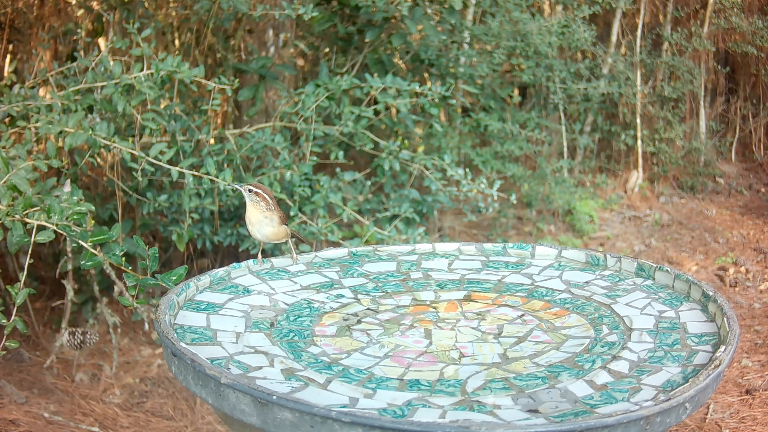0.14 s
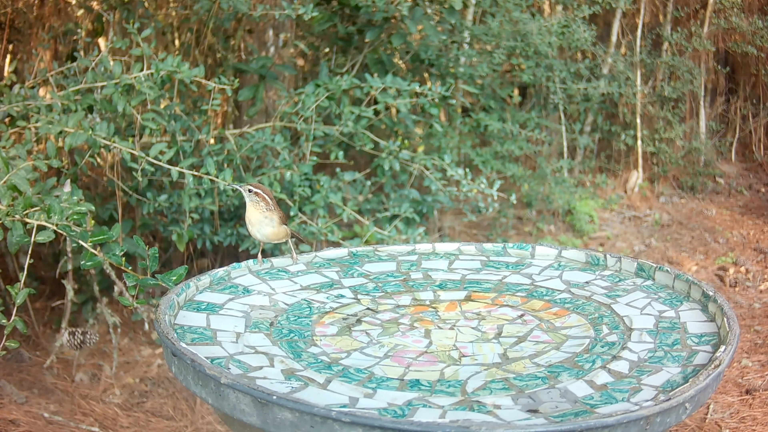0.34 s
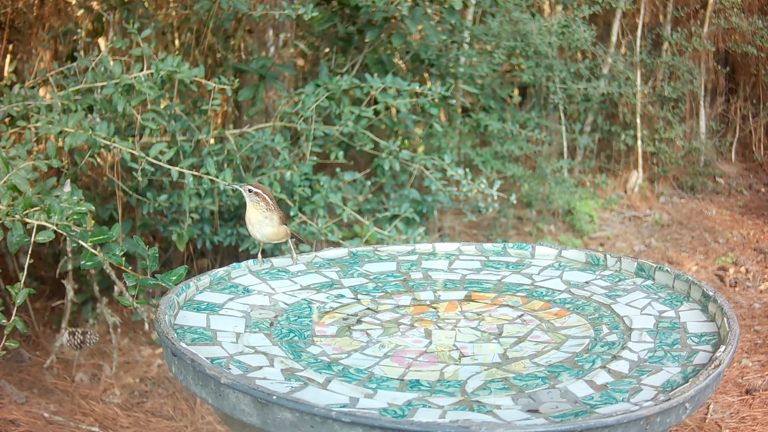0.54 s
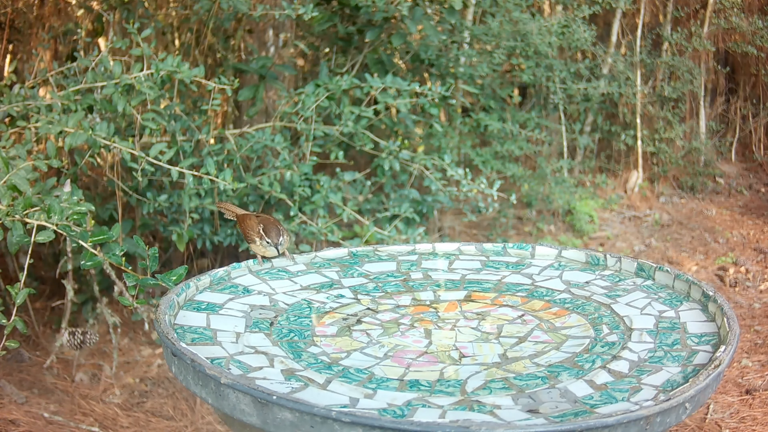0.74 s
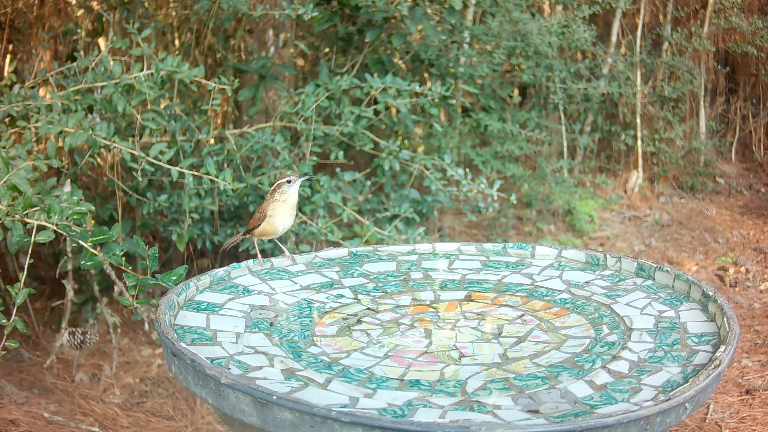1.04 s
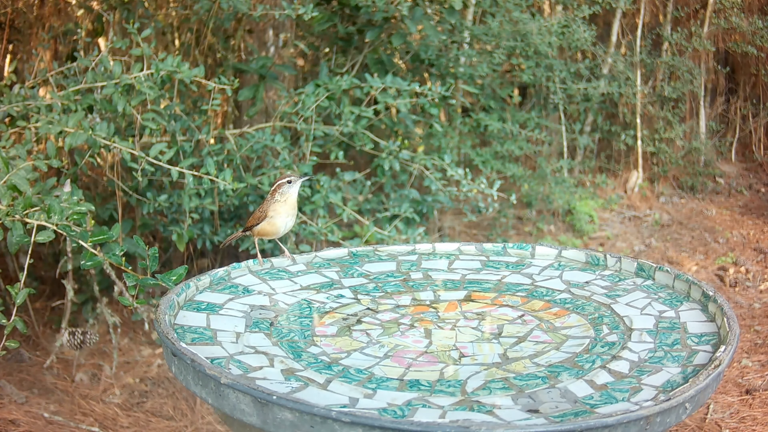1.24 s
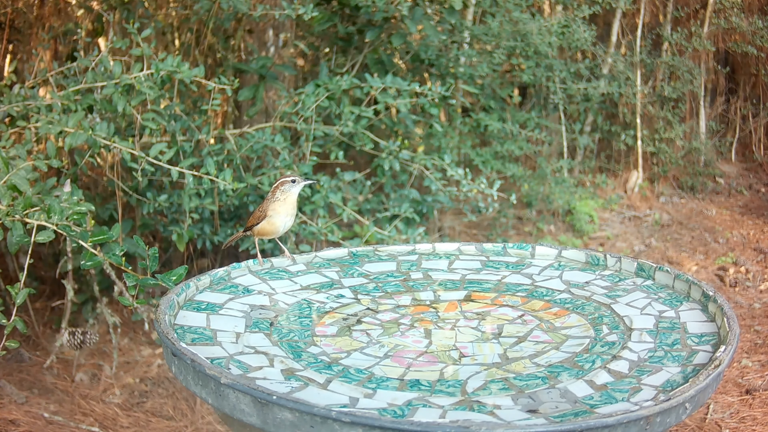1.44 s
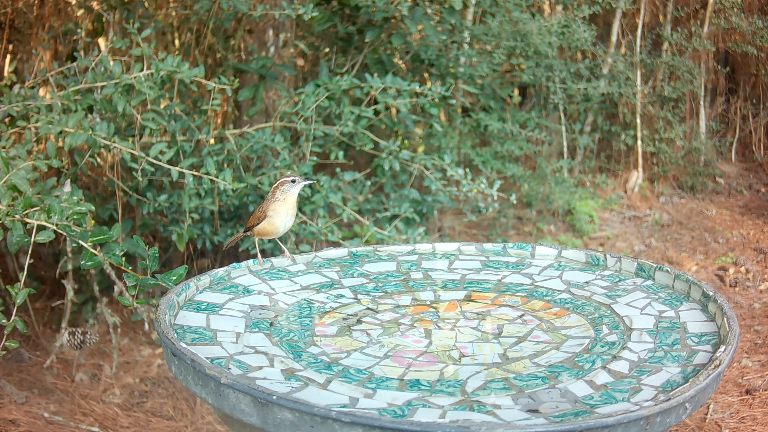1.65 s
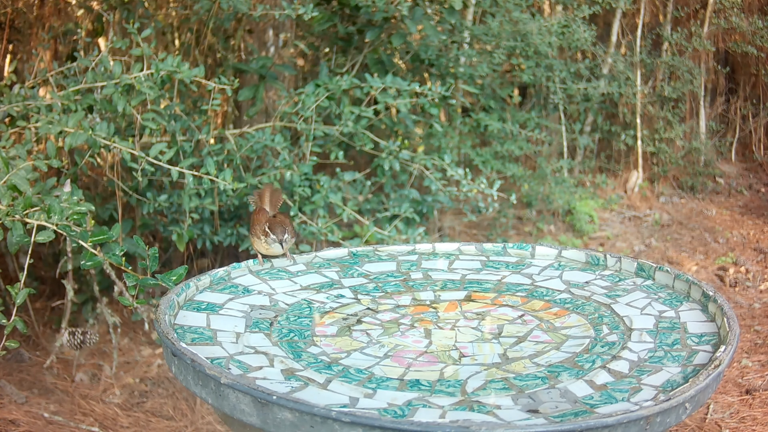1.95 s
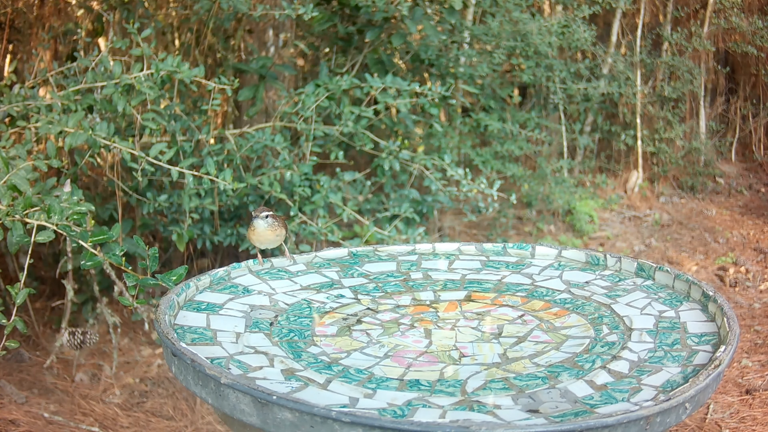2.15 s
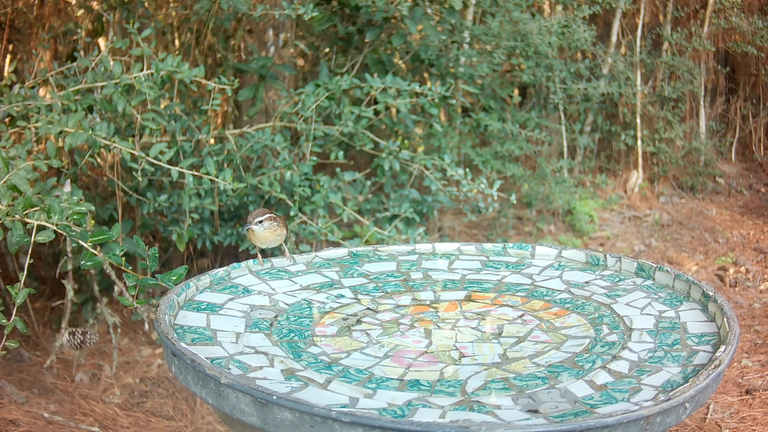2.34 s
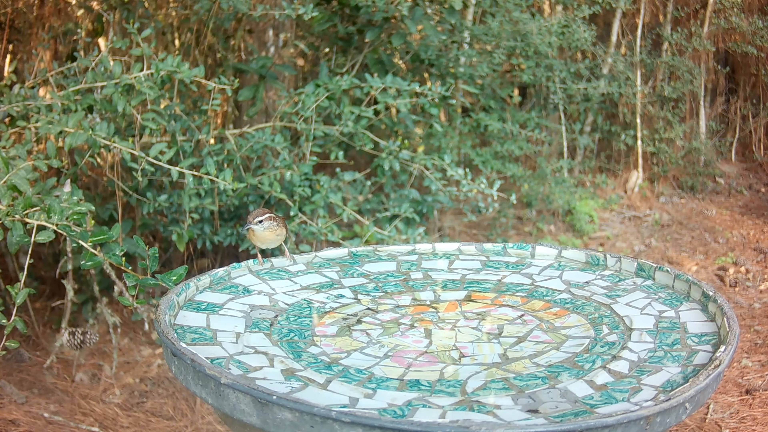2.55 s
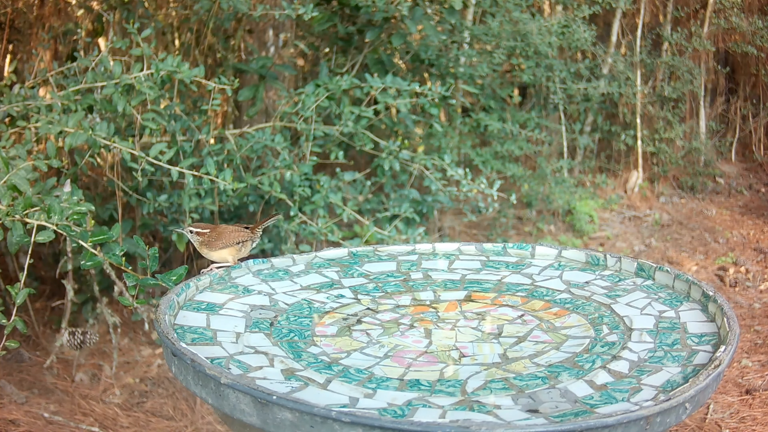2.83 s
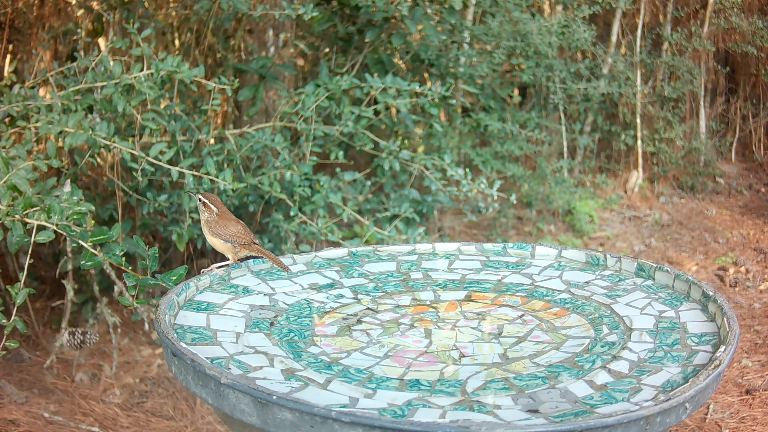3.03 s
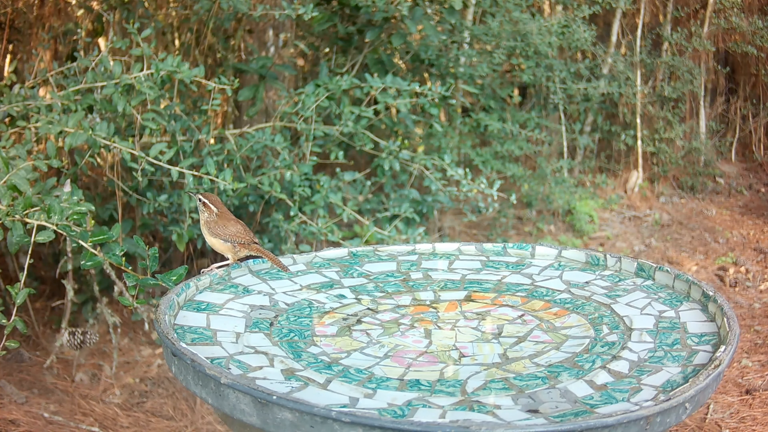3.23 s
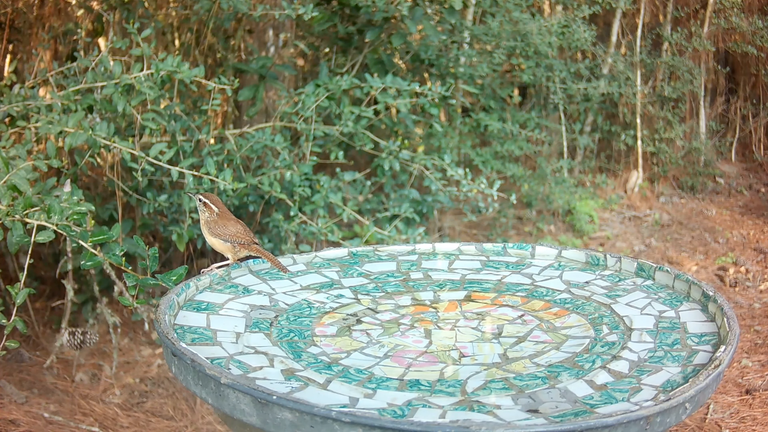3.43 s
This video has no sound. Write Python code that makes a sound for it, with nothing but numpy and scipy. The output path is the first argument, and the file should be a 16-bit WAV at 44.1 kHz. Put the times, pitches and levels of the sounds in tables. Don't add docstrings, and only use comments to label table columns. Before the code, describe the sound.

Backyard at a wood's edge, open-air pickup. Faint far whistles open, then a nearby wren fires short rising raspy chirps in three clusters. A steady series of soft descending slurs takes over for several seconds. Feathery wing snaps crackle past during its end, just after a tiny wooden thump, and again a second later. Distant birdsong returns echoing from trees, over a low wash of traffic and blurred chorus.

```python
import sys
import numpy as np
from scipy import signal
from scipy.fft import rfft, irfft
from scipy.io import wavfile
from scipy.ndimage import uniform_filter1d, map_coordinates

SR = 44100
rng = np.random.default_rng(int(sys.argv[2]) if len(sys.argv) > 2 else 0)


def voltage_ratio(level):
    return 10 ** (np.asarray(level, float) / 20)


def waveform_to_disk(signal):
    frames = np.transpose(np.atleast_2d(signal))
    scaled = np.clip(frames, -1, 1) * 32767
    samples = np.round(scaled).astype(np.int16)
    wavfile.write(sys.argv[1], SR, samples)


N = 359856

# start_s, length_s, peak_db, start_pitch_hz, end_pitch_hz
CHIRPS = [(0.753, 0.027, -24.5, 2100, 2440), (0.826, 0.026, -22, 1993, 2473),
          (0.8895, 0.03, -20.5, 1980, 2490), (0.9759, 0.035, -17.5, 1990, 2555),
          (1.0393, 0.032, -21, 2130, 2723), (1.1235, 0.035, -21, 1960, 2563),
          (1.8667, 0.029, -24.5, 2140, 2410), (1.95, 0.035, -25, 2023, 2457),
          (2.871, 0.027, -28.5, 1877, 2176), (2.9117, 0.023, -31.5, 2094, 2650),
          (2.979, 0.032, -27, 2093, 2540), (3.068, 0.037, -26, 1945, 2400)]
# half_steps_db, overtones_db, lateness of the swell (0-1)
CHIRP_VOICES = [(4, 10, .5), (0.5, -0.5, .5), (-1.5, -2.5, 0.6), (0, -2, .62), (-16, -7, .5), (-7, 0, .45),
                (3.5, 4.5, .45), (-1.5, -8, 0.36), (-3.5, 1.5, 0.39), (-7, -7, 0.4), (-2.5, -2.5, .4),
                (-0.5, -2.5, 0.4)]
# share of length (0-1), level_db
CHIRP_SWELL = [(0, -40), (.04, -30), (.07, -8), (.35, -2.5), (.6, 0), (.78, -3.5), (.9, -8), (1, -26)]
# multiple of the pitch, level_db, roughness (0-1)
CHIRP_PARTS = [(.68, -30, .4), (1.5, -26, .6), (1.7, -18, .35), (2, -20, .12), (2.5, -36, .5),
               (3, -30, .25), (4, -31, .4), (5, -29, .7)]
# frequency_hz, gain_db
THROAT = [(900, -42), (1600, 7), (3100, 4), (3800, 0.5), (4300, -4), (4900, -19), (5300, -12.5),
          (6000, -4.5), (7000, -20.5), (8000, -20), (12000, -41.5), (16000, -56.5)]

# start_s, level_db, hold on the middle step (0-1)
SLURS = [(2.0989, -45.5, 0.98), (2.2946, -45.5, 0.94), (2.4889, -43.5, 0.8), (2.6889, -42.5, 0.74),
         (2.883, -40.5, 0.17), (3.076, -40, 0.1), (3.2577, -39, 0), (3.4414, -37.5, 0.07),
         (3.6257, -37, 0.03), (3.809, -37, 0.03), (3.993, -37.5, 0.1), (4.1757, -38, 0), (4.3618, -37.5, 0),
         (4.5452, -39, 0.05), (4.7285, -38.5, .07), (4.9109, -39, 0.1), (5.099, -39, 0.05),
         (5.285, -40.5, 0), (5.479, -39, 0.38), (5.6705, -41, 0.46), (5.8746, -43, 0.04)]
# after_onset_s, smooth_pitch_hz, stepped_pitch_hz
SLUR_PITCH = [(-.004, 3250, 3190), (.011, 2980, 3050), (.021, 2680, 2670), (.034, 2520, 2610),
              (.044, 2290, 2570), (.052, 2110, 1880), (.062, 1830, 1620), (.08, 1560, 1510),
              (.12, 1290, 1285)]
# after_onset_s, smooth_level_db, stepped_level_db
SLUR_BREATH = [(-.004, 3.5, -1), (.008, -2.5, 2.5), (0.02, 4, 4.5), (0.039, 4, 7), (.051, 3.5, -2.5),
               (0.07, -1, -2), (.1, -15.5, -15.5), (0.121, -24, -28.5)]
# pitch_hz, gain_db
SLUR_PATH = [(1300, -3.5), (1550, -6.5), (1950, -10), (2300, -6.5), (2600, -8.5), (2780, -15), (2860, -12),
             (2950, -2.5), (3100, -2.5), (3330, -2), (3600, -13), (4200, -31), (6000, -45), (8000, -35)]
# multiple of the pitch, best_heard_hz, level_db
SLUR_PARTS = [(2, 5200, -47), (3, 9300, -57), (4, 8100, -42), (5, 11800, -51), (5, 7700, -53)]
# delay_s, level_db
REFLECTIONS = [(.00517, -6.5), (.008, -16), (0.02, -36), (0.0247, -28), (.0315, -22.5)]

# start_s, snap_db, puff_db
BEATS = [(2.712, -66, -64), (2.729, -61.5, -73), (2.757, -72, -68), (2.778, -72, -66), (5.366, -55, -37.5),
         (5.398, -53, -37), (5.432, -54, -42), (5.466, -54, -46), (5.502, -67, -44.5), (5.54, -66, -39),
         (5.577, -56, -42.5), (5.618, -61.5, -47), (5.652, -58, -50), (5.697, -64, -40), (6.757, -63, -49),
         (6.795, -52, -46), (6.83, -59, -50), (6.865, -55, -44.5), (6.9, -61.5, -42), (6.943, -70, -39),
         (6.986, -68, -53), (7.033, -72, -54)]
# start_s, snap_db, puff_db
TICKS = [(3.609, -83, -79), (4.06, -64, -78), (4.519, -61.5, -77), (4.617, -62, -74), (4.659, -64, -90),
         (5.089, -59, -54), (5.103, -60, -55), (6.012, -69, -78), (6.083, -63, -93), (6.174, -79, -80),
         (6.347, -66, -82), (6.669, -58.5, -47), (7.406, -81, -92)]
# frequency_hz, gain_db
FEATHER = [(800, -16), (2000, 20.5), (3500, 6.5), (4400, 9), (5100, -15.5), (6300, -3), (9000, -6),
           (12000, -10.5), (16000, -19)]
# frequency_hz, gain_db
PUFF = [(100, -23), (400, -11.5), (900, -18.5), (1500, 5.5), (2300, -2), (4000, -42.5)]
# start_s, bright_db, body_db
HOP_CRACKS = [(2.7153, -62, -47), (2.7245, -58, -50), (2.7278, -68, -55), (2.7315, -58, -56),
              (2.7333, -68, -54), (2.7347, -69, -58), (2.739, -64, -57), (2.743, -64, -45),
              (2.7576, -57, -43), (2.7774, -65, -51)]
# start_s, bright_db, body_db
FIRST_CRACKS = [(5.371, -63, -49), (5.3746, -60, -38), (5.378, -58, -47), (5.38, -54, -33),
                (5.3912, -63, -48), (5.4008, -52, -45), (5.3991, -53, -31), (5.4047, -54, -35),
                (5.407, -61, -49), (5.4092, -58, -40), (5.411, -63, -48), (5.4265, -56, -43),
                (5.4364, -57, -36), (5.438, -52, -39), (5.4395, -64, -48), (5.441, -65, -40),
                (5.4436, -62, -51), (5.4656, -60, -44), (5.468, -59, -40), (5.472, -62, -38),
                (5.4756, -58, -46), (5.476, -59, -43), (5.4781, -57, -48), (5.4852, -57, -43),
                (5.487, -62, -54), (5.4907, -56, -46), (5.4974, -64, -43), (5.502, -63, -49),
                (5.5035, -49, -30), (5.5069, -49, -37.5), (5.5085, -54, -40), (5.512, -62, -52),
                (5.5138, -40.5, -43), (5.5174, -57, -40), (5.5435, -55, -45), (5.5442, -53, -45),
                (5.5468, -61, -47), (5.5478, -55, -47), (5.5537, -57, -48), (5.5789, -57, -47),
                (5.5841, -54, -41), (5.5867, -62, -48), (5.5895, -61, -47), (5.5942, -61, -47),
                (5.5965, -65, -49), (5.619, -61, -45), (5.622, -58, -44), (5.6268, -62, -49),
                (5.6297, -52, -55), (5.653, -57, -50), (5.6655, -56.5, -38), (5.668, -65, -52),
                (5.6722, -60, -50), (5.6737, -60, -43), (5.676, -60, -37), (5.7009, -60, -40)]
# start_s, bright_db, body_db
SECOND_CRACKS = [(6.757, -66, -51), (6.761, -60, -39), (6.7614, -64, -49), (6.7668, -65, -47),
                 (6.771, -58, -41), (6.779, -60, -35), (6.7809, -63, -41), (6.786, -70, -40),
                 (6.7954, -66, -49), (6.8025, -66, -49), (6.8022, -69, -59), (6.8042, -71, -40),
                 (6.8302, -66, -43), (6.8324, -71, -49), (6.838, -68, -48), (6.8772, -66, -40),
                 (6.899, -62, -48), (6.9016, -51.5, -39), (6.905, -56, -38), (6.9056, -63, -53),
                 (6.9088, -62, -53), (6.9136, -64, -50), (6.9419, -67, -55), (6.9439, -64, -47),
                 (6.9468, -50, -36.5), (6.9484, -66, -46), (6.9503, -54, -45), (6.954, -63, -42),
                 (6.9544, -63, -47), (6.9574, -56, -62), (6.98, -63, -49), (6.9884, -60, -41),
                 (6.9905, -59, -45), (6.998, -54, -45), (7.001, -63, -49), (7.004, -66, -53),
                 (7.035, -63, -42), (7.0368, -67, -59)]
# frequency_hz, gain_db
QUILL = [(3300, -21), (4500, 7.5), (6000, 2), (9000, -1.5), (12000, -10.5), (16000, -17)]
# frequency_hz, gain_db
VANE = [(200, -26), (700, -8), (1500, 1.5), (2600, 1.5), (3600, 2), (5000, -41.5)]
# start_s, level_db, pitch_hz, t60_s
KNOCK = [
    (5.119, -50, 520, .03),
    (5.118, -51, 820, .02),
    (5.117, -49, 1300, .012),
    (5.117, -49, 1900, .01),
    (5.5135, -44, 5700, .02),
    (5.4852, -60, 6800, .015),
    (6.868, -47, 2900, .02),
    (6.8755, -44, 1900, .025),
    (6.866, -58, 4600, .04),
]

# start_s of the main whistle, level_db
PHRASES = [
    (-.04, -63),
    (.40, -62.5),
    (.871, -63),
    (1.31, -62),
    (1.747, -64),
    (7.11, -62),
    (7.56, -61),
    (7.99, -61),
]
# after_main_s, length_s, level_db, start_pitch_hz, end_pitch_hz
PHRASE = [
    (-.13, .08, -12, 2930, 3200),
    (-.09, .11, -9, 1615, 1760),
    (0, .18, 1.5, 1777, 2262),
    (.11, .11, -8, 3022, 3224),
]
# after_main_s, length_s, level_db, start_pitch_hz, end_pitch_hz
PHRASE_CHIP = [
    (.165, .035, -21, 3700, 5330),
]
# start_s, length_s, level_db, start_pitch_hz, end_pitch_hz
WHISTLES = [
    (1.4, .15, -66, 1830, 1493),
    (1.435, 0.045, -64.5, 3600, 3220),
    (1.545, 0.039, -62, 3060, 2880),
    (1.585, 0.14, -54, 2700, 1726),
    (1.98, 0.071, -53.5, 2250, 1736),
    (4.101, .008, -78, 7000, 5460),
]
# start_s, level_db
FAR_SLURS = [
    (.048, -64.5),
    (.238, -62),
    (.425, -64.5),
    (.611, -65),
    (7.135, -67),
    (7.322, -66),
    (7.515, -63),
    (7.70, -61.5),
    (7.893, -62),
    (8.078, -61),
]
# after_onset_s, pitch_hz, level_db
FAR_SLUR = [(0, 3600, -6), (.008, 3150, 1), (.03, 2740, 1), (.045, 2540, 5), (.056, 2000, 3.5),
            (.066, 1730, 6.5), (.088, 1580, -3)]
# start_s, level_db
CHIPS = [
    (1.955, -80),
    (4.114, -68.5),
    (4.7, -79),
    (7.072, -79),
    (8.102, -93),
]
# start_s, length_s, level_db, pitch_hz
INSECT = [
    (6.15, .14, -90, 6200),
    (6.38, 0.12, -85.5, 6180),
    (6.502, 0.14, -89, 6300),
]

# start_s, length_s, level_db, pitch_hz
DRONES = [
    (.3, 0.29, -75, 503),
    (.9, 1.25, -73.5, 539),
    (1, 0.44, -71, 963),
    (3, 1.35, -72.5, 642),
    (3.4, 0.57, -71, 1138),
    (4.5, 2.2, -69, 1247),
    (5.7, 1.5, -70, 810),
    (6, 1.4, -69, 1381),
    (8, 0.25, -67.5, 732),
]
# frequency_hz, level_db per Hz
AIR = [(20, -27), (40, -13.5), (107, -13.5), (165, -15.5), (360, -9.5), (700, -0.5), (1300, -1.5),
       (2500, -6.5), (3400, -25.5), (4100, -33), (5500, -30), (7900, -31), (8500, -38), (16000, -38)]
# frequency_hz, level_db per Hz
CHORUS = [(900, -46.5), (1200, -9), (1700, 4.5), (2200, 0.5), (2700, 0.5), (3300, -6), (3900, -12),
          (4800, -22), (6000, -54)]
# time_s, traffic_db, chorus_db
AIR_LEVEL = [(0, -69.5, -62.5), (1, -67.5, -59.5), (1.6, -67, -61), (2.4, -69, -60), (3.198, -68.5, -60.5),
             (4.2, -67, -57.5), (5.199, -68, -60), (6, -66.5, -62.5), (6.5, -67.5, -64.5),
             (7.201, -67.5, -62.5), (8.16, -68, -60)]
# pitch_hz, level_db
HUMS = [(110, -87), (128, -90)]
# frequency_hz, t60_s
TREES = [(1000, 0.29), (3000, 0.58), (8000, 0.7)]

TREBLE_GAPS = [
    [.125, 2.07, 2.54, 4.09, 4.58, 4.63, 4.94, 5.2, 5.72, 5.76, 5.88, 6.525, 6.63, 7.225, 7.27, 7.545,
     7.693, 7.78, 7.97, 8.06],
    [6.855, 1.53, 1.77, 1.92, 2.41, 3, 3.478, 4.01, 6.1, 7.15, 7.615],
]
GAP_LENGTHS = [.02, .034]
# start_s, length_s, level_db, pitch_hz
THIN_LINES = [(0.999, 0.022, -78, 6900), (1.5, 0.075, -88, 5430.0), (1.78, 0.05, -98, 6860.0),
              (1.91, 0.035, -84, 7790.0), (1.91, 0.029, -86, 7090.0), (1.903, 0.045, -74, 6070),
              (2.063, 0.052, -94, 6210.0), (4.003, 0.03, -84, 5100.0), (4.02, 0.033, -80, 8040.0),
              (4.18, 0.04, -84, 5850.0), (4.18, 0.04, -87, 7240.0), (4.193, 0.03, -80, 5240.0),
              (4.575, 0.035, -80, 8010.0), (4.616, 0.029, -79, 9010.0), (4.58, 0.04, -83, 4910.0),
              (5.707, 0.032, -77, 4610.0), (6.852, 0.051, -79, 5610.0), (6.77, 0.035, -82, 6590.0),
              (7.135, 0.04, -92, 7700), (7.268, 0.03, -86, 6380), (7.62, 0.035, -93, 5450.0),
              (7.11, 0.24, -86, 4560.0)]


def unit(x):
    return x / np.sqrt(np.mean(x ** 2) + 1e-20)


def along(points, hz):
    f, v = np.transpose(points)
    return np.interp(np.log(hz + 1), np.log(f + 1), v)


def coloured(x, spectrum):
    return irfft(rfft(x) * voltage_ratio(along(spectrum, np.fft.rfftfreq(N, 1 / SR))), N)


def wobble(n, rate):
    knots = rng.standard_normal(int(n * rate / SR) + 4)
    return map_coordinates(knots, [np.arange(n) * rate / SR])


def add(out, s, sound):
    at = round(s * SR)
    piece = out[max(at, 0):][:len(sound) + min(at, 0)]
    piece += sound[max(-at, 0):][:len(piece)]


def glide(length, start_hz, end_hz, bend):
    n = round(length * SR)
    u = np.arange(n) / n
    return u, start_hz + (end_hz - start_hz) * (u + (4 * bend - 2) * u * (1 - u))


def tone(hz):
    return np.sin(2 * np.pi * (np.cumsum(hz) / SR + rng.random()))


def chirps():
    clear, rasp = np.zeros(N), np.zeros(N)
    for (s, length, db, start_hz, end_hz), (half_db, over_db, late) in zip(CHIRPS, CHIRP_VOICES):
        u, hz = glide(length, start_hz, end_hz, bend=0.526)
        hz = hz - 0.99 * (end_hz - start_hz) * np.sin(2 * np.pi * u) / (2 * np.pi)
        waver = .036 * tone(np.full(len(u), 190.)) + .014 * wobble(len(u), 700)
        onset_drop = 0.079 * np.exp(-u / 0.044)
        hz = hz * (1 + waver + onset_drop)
        effort = u - (4 * late - 2) * u * (1 - u)
        swell = voltage_ratio(db + np.interp(effort, *np.transpose(CHIRP_SWELL)))
        swell = swell * np.tanh(60 * u * (1 - u))
        add(clear, s, swell * (1 + .08 * wobble(len(u), 900)) * tone(hz))
        for multiple, part_db, rough in CHIRP_PARTS:
            is_overtone = abs(multiple - round(multiple)) < .1
            voice_db = over_db if is_overtone else half_db
            clearing_db = 4.5 * multiple * u ** 2
            roughness = 1 + rough * wobble(len(u), 900)
            part = voltage_ratio(part_db + voice_db - clearing_db) * roughness * tone(multiple * hz)
            add(rasp, s, swell * part)
    return clear + coloured(rasp, THROAT)


def slurs():
    out = np.zeros(N)
    plunge_s, plunge_hz, plunge_fall_s = .0085, 4700, .0017
    at, smooth_hz, stepped_hz = np.transpose(SLUR_PITCH)
    breath_at, smooth_db, stepped_db = np.transpose(SLUR_BREATH)
    for s, db, hold in SLURS:
        last = s == SLURS[-1][0]
        stretch = 2.3 if last else 1
        knots = at + (stretch - 1) * np.maximum(at - .025, 0)
        breaths = breath_at + (stretch - 1) * np.maximum(breath_at - .025, 0)
        t = np.arange(round((knots[-1] + plunge_s) * SR)) / SR - plunge_s
        plunge = np.minimum(np.exp(-(t + plunge_s - hold * .002) / plunge_fall_s), 1)
        hz = np.interp(t, knots, smooth_hz + hold * (stepped_hz - smooth_hz))
        hz = uniform_filter1d(hz, size=50) + plunge_hz * plunge
        note = voltage_ratio(along(SLUR_PATH, hz) + 1.5 * wobble(len(t), 81.6)) * tone(hz)
        for multiple, best_hz, part_db in SLUR_PARTS:
            off_resonance_db = 1100 * np.log(multiple * hz / best_hz) ** 2
            note += voltage_ratio(part_db - 14 * hold - off_resonance_db) * tone(multiple * hz)
        faintness = max(hold, .6 if last else 0)
        lost_db = 20 * faintness + 7 * np.abs(wobble(len(t), 400))
        breath_db = np.interp(t, breaths, smooth_db + hold * (stepped_db - smooth_db))
        breath_db = breath_db - lost_db * np.sqrt(plunge)
        add(out, s - plunge_s, voltage_ratio(db + 2.5 + breath_db) * note)
    dull = coloured(out, [(2750, -.5), (3100, -4.5), (5500, -23)])
    return out + sum(voltage_ratio(db) * np.roll(dull, round(s * SR)) for s, db in REFLECTIONS)


def beat_snaps():
    events = []
    for s, db, low_db in BEATS:
        for k in range(6):
            late, size, puff = np.tanh(rng.standard_normal(3))
            start = s + .003 * (k + .9 * late * (k > 0))
            events.append((start, db - 13 + 4 * size - .8 * k, low_db - 6 + 5 * puff))
    return events


def flutter():
    bright, dull, t = np.zeros(N), np.zeros(N), np.arange(500) / SR
    for s, db, low_db in TICKS + beat_snaps():
        snap, puff = rng.standard_normal((2, len(t)))
        add(bright, s, voltage_ratio(db + 8.5 - 60 * t / .008) * snap)
        add(dull, s - .001, voltage_ratio(low_db + 8.5 - 60 * t / .022) * (1 - np.exp(-t / 0.00035)) * puff)
    return coloured(bright, FEATHER) + coloured(dull, PUFF)


def cracks():
    bright, body, t = np.zeros(N), np.zeros(N), np.arange(200) / SR
    for s, db, body_db in HOP_CRACKS + FIRST_CRACKS + SECOND_CRACKS:
        push = 0.42 * rng.standard_normal(len(t)) * voltage_ratio(-60 * t / 0.0038)
        push[0] = rng.choice([-1, 1])
        add(bright, s, voltage_ratio(db + 8.5) * push)
        add(body, s, voltage_ratio(body_db + 13) * push)
    return coloured(bright, QUILL) + coloured(body, VANE)


def knock():
    out, t = np.zeros(N), np.arange(SR // 10) / SR
    for s, db, hz, t60 in KNOCK:
        attack = 1 - np.exp(-t / 0.00056)
        add(out, s, voltage_ratio(db - 60 * t / t60) * attack * np.sin(2 * np.pi * hz * t))
    return out


def whistles(table, edge, bend):
    out = np.zeros(N)
    for s, length, db, *pitch_hz in table:
        if s + length > 0:
            u, hz = glide(length, *pitch_hz, bend)
            broken = voltage_ratio(2.5 * wobble(len(u), 70))
            swell = voltage_ratio(db + 3.0) * broken * np.sin(np.pi * u) ** edge
            add(out, s, swell * tone(hz + 30 * wobble(len(u), 60)))
    return out


def steady(table):
    return [(*row, row[-1]) for row in table]


def sung(phrase):
    events = []
    for s, db in PHRASES:
        for lag, length, part_db, *hz in phrase:
            events.append((s + lag, length, db + part_db, *hz))
    return events


def far_slurs():
    out = np.zeros(N)
    at, hz, swell_db = np.transpose(FAR_SLUR)
    t = np.arange(round(at[-1] * SR)) / SR
    for s, db in FAR_SLURS:
        level_db = db + np.interp(t, at, swell_db) + 3.7 * wobble(len(t), 69)
        add(out, s, voltage_ratio(level_db) * tone(np.interp(t, at, hz)))
    return out


def far_chips():
    lone = [(s, 0.022, db, 5250, 7850) for s, db in CHIPS]
    return whistles(sung(PHRASE_CHIP), edge=0.25, bend=.84) + whistles(lone, edge=0.14, bend=0.73)


def trees(x, shorter):
    out, step = np.zeros(N + 3 * SR), SR // 4
    x = np.pad(x, (step, 2 * step))
    fade = np.sin(np.pi * np.arange(2 * step) / (2 * step))
    for start in range(0, N + step, step):
        hz, t, z = signal.stft(rng.standard_normal(SR // 2), SR, nperseg=256)
        decay = voltage_ratio(-60 * t / (shorter * along(TREES, hz)[:, None]))
        tail = signal.istft(z * decay, SR, nperseg=256)[1]
        heard = fade * x[start:start + 2 * step]
        add(out, start / SR, signal.fftconvolve(heard, tail / np.linalg.norm(tail)))
    return out[step:N + step]


def drones():
    out = np.zeros(N)
    for s, length, db, hz in DRONES:
        t = np.arange(round(length * SR)) / SR
        pair = wobble(len(t), 60) + 1j * wobble(len(t), 60)
        swell = voltage_ratio(db) * np.sqrt(np.abs(np.sin(np.pi * t / length)))
        add(out, s, swell * np.real(pair * np.exp(2j * np.pi * hz * t)))
    return out


def rush(spectrum, patchy_db):
    hz, _, z = signal.stft(rng.standard_normal(N + 512), SR, nperseg=1024)
    field = uniform_filter1d(uniform_filter1d(rng.standard_normal(z.shape), 8, 0), 6, 1)
    gain = voltage_ratio(along(spectrum, hz)[:, None] + patchy_db * unit(field))
    return unit(signal.istft(z * gain, nperseg=1024)[1][:N])


def air():
    s, traffic_db, chorus_db = np.transpose(AIR_LEVEL)
    t = np.arange(N) / SR
    hums = sum(voltage_ratio(db + 0.5 + 0.92 * wobble(N, 4.5)) * tone(hz + 3 * wobble(N, 29)) for hz, db in HUMS)
    traffic = voltage_ratio(np.interp(t, s, traffic_db) + 3.0) * rush(AIR, patchy_db=2.5)
    chorus = voltage_ratio(np.interp(t, s, chorus_db) - 2.0) * rush(CHORUS, patchy_db=2.5)
    return traffic + chorus + hums


def scene():
    near, song, wings = chirps(), slurs(), flutter() + cracks()
    far = whistles(sung(PHRASE), edge=0.94, bend=.72) + whistles(WHISTLES, edge=0.36, bend=.64) + far_slurs()
    chips = far_chips()
    insect = whistles(steady(INSECT), edge=0.38, bend=.5)
    near_echo = trees(voltage_ratio(-19.5) * near + voltage_ratio(-11.5) * wings, shorter=0.44)
    far_echo = trees(voltage_ratio(-5.5) * song + voltage_ratio(-0.5) * far + voltage_ratio(2.0) * chips, shorter=0.94)
    direct = near + song + far + chips + insect + wings + knock()
    return (direct + near_echo + far_echo + air() + drones())[None]


def low_pass(x):
    return signal.sosfilt(signal.butter(12, 15750, fs=SR, output="sos"), x)


def record(dry):
    lost = np.zeros(N)
    for starts, length in zip(TREBLE_GAPS, GAP_LENGTHS):
        for s in starts:
            add(lost, s, np.ones(round(length * SR)))
    treble = coloured(dry[0], [(3400, -40), (4100, -2.2)])
    lines = whistles(steady(THIN_LINES), edge=0.73, bend=.5)
    return low_pass(dry - uniform_filter1d(lost, size=200) * treble + lines)


dry = scene()
out = record(dry)
waveform_to_disk(out)
```